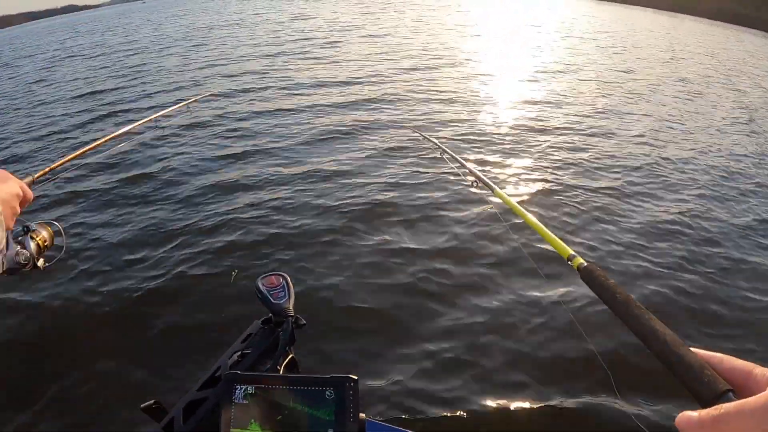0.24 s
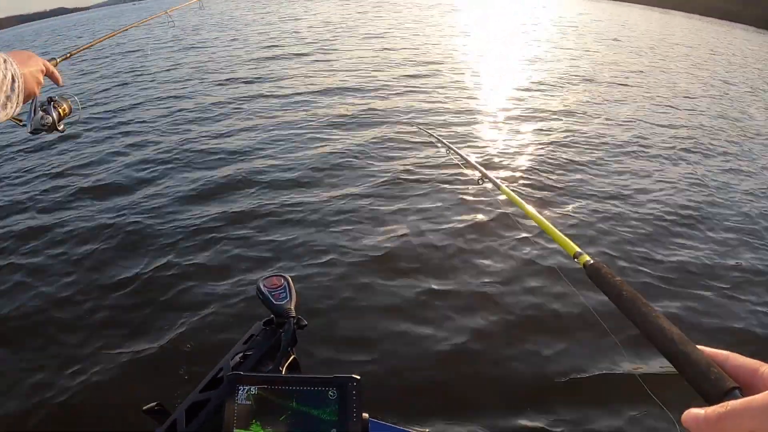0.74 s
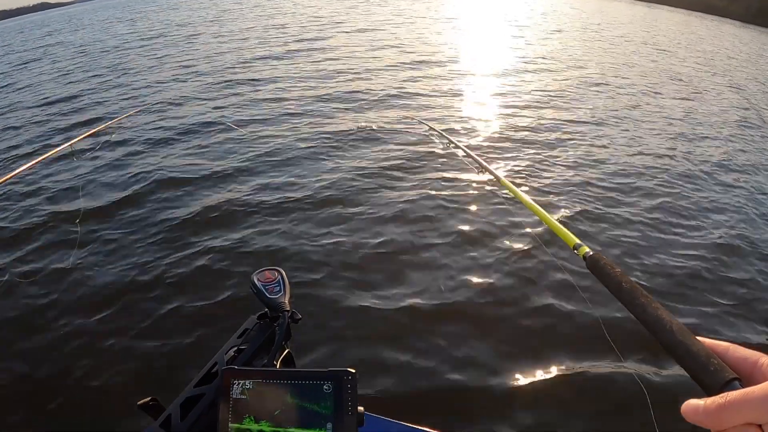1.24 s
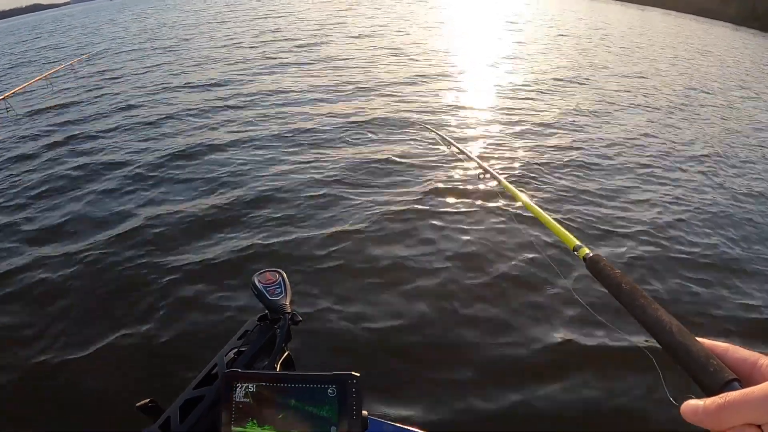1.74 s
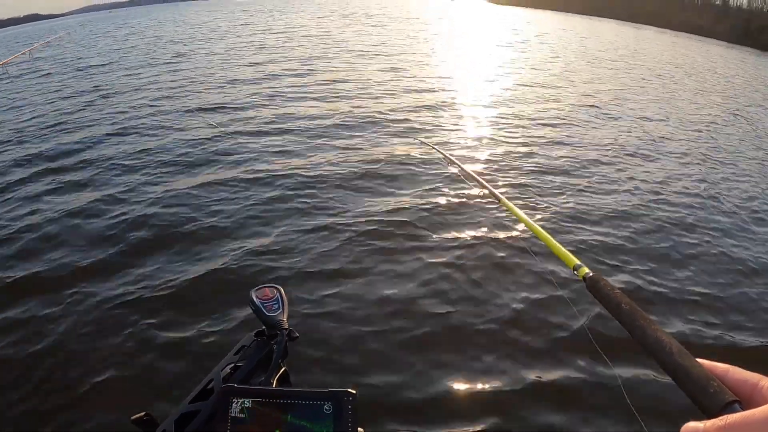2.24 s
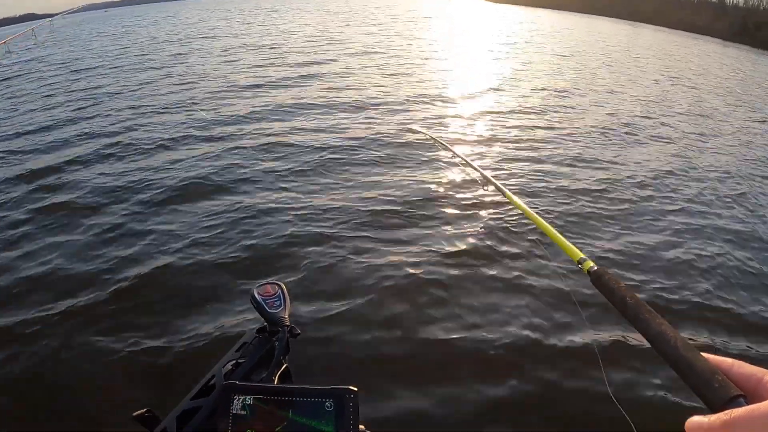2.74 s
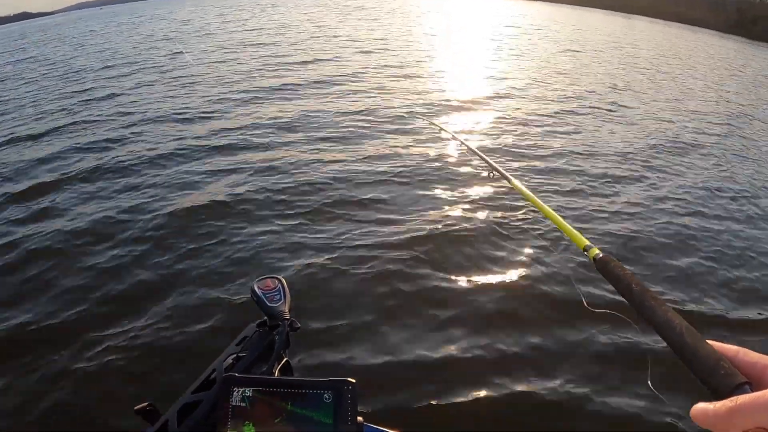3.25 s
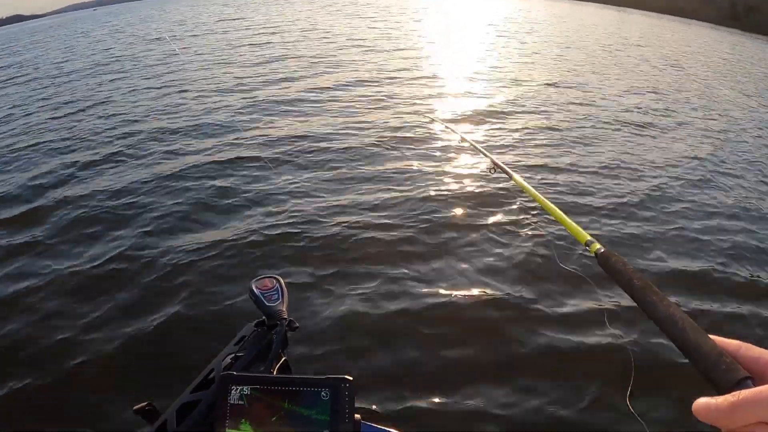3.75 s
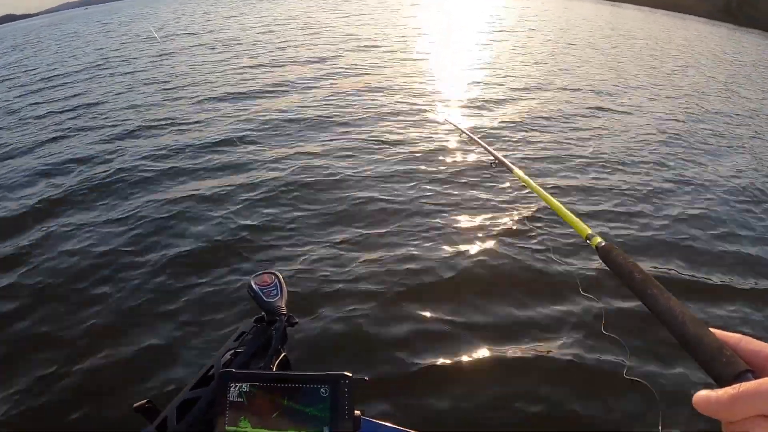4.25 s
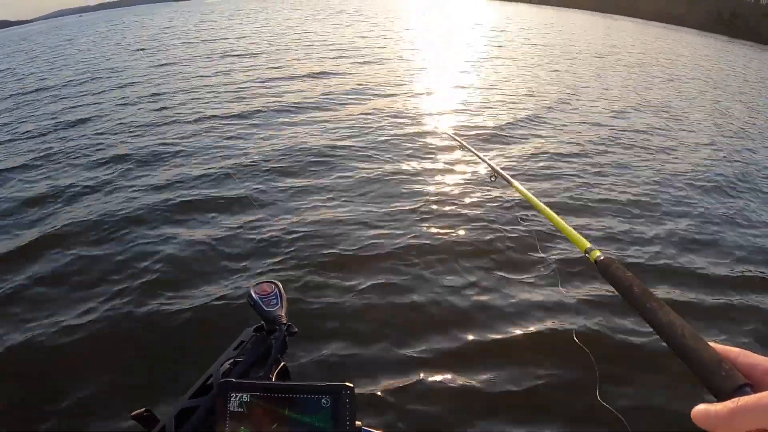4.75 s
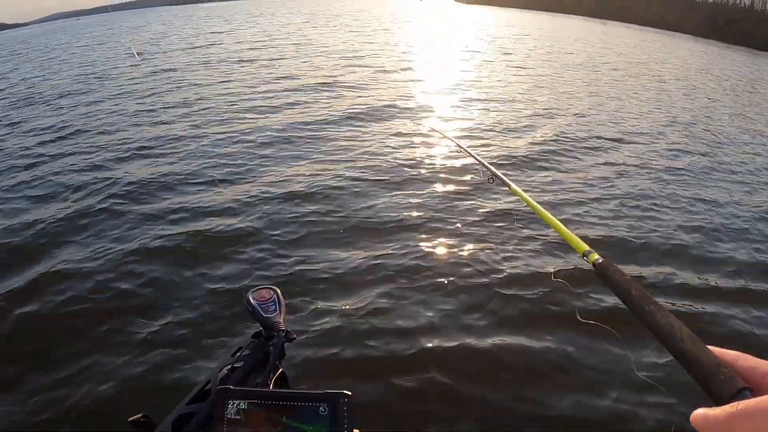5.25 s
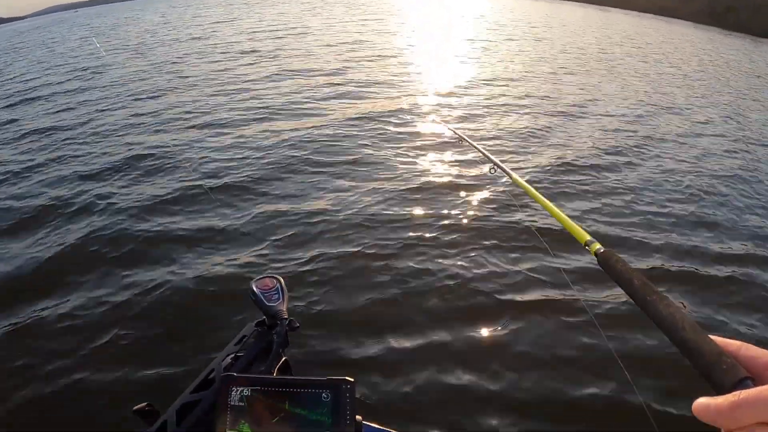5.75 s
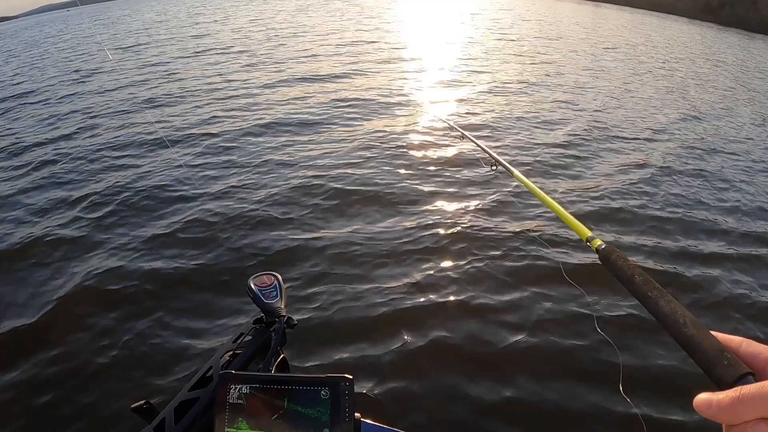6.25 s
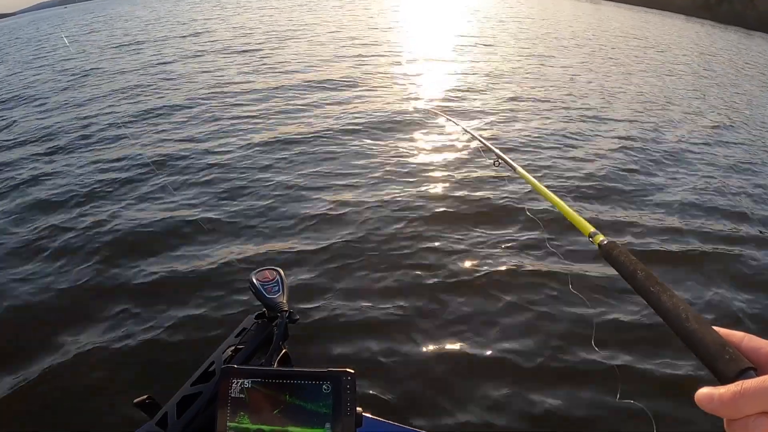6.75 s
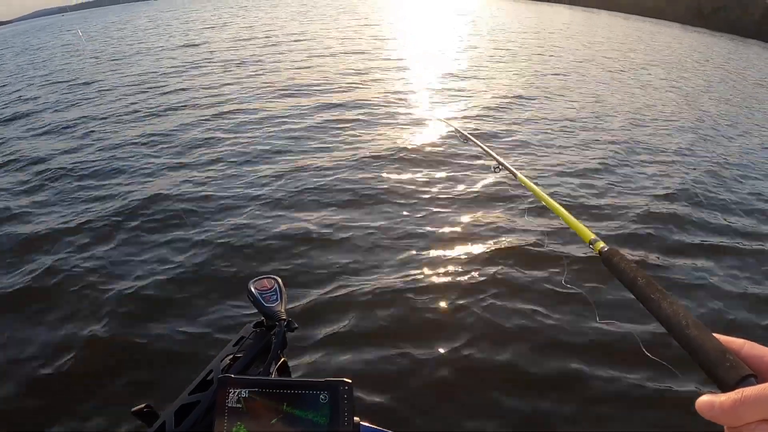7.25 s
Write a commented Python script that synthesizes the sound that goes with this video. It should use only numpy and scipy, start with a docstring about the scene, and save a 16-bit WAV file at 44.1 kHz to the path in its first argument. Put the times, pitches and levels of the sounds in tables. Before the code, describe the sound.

Small waves lap against the hull of an open boat on a lake, heard close up from on board. A sharp wet smack comes at about 0.5 seconds, then hollow slaps at around 1, 1.4, 2.3 and 2.8 seconds, each with bubbly plops, droplets and a brief fizz of foam. From 3 seconds the lapping is lighter and irregular, with small splashes and gurgles near 4.4, 4.9, 5.4, 6.5 and 7.2 seconds. Wind buffets the microphone with a low, uneven rumble, gusting near 1 second, between 2 and 3 seconds and at 4 seconds, then more strongly from about 5.2 to 6.7 seconds, with a last short thump of wind near 7.5 seconds. Underneath, a faint, slightly wavering electric motor hum and the low wash of open water continue throughout.

```python
"""On a lake, small waves slap the hull of an open boat, heard on board through two microphone ports.
Each impact sets the hull ringing, traps air pockets that resonate as plops, throws droplets
and leaves a fizz of bursting foam. Turbulent wind buffets the ports, an electric motor
hums through the hull, and the low wash of open water lies underneath."""
import sys
import numpy as np
from scipy import signal
from scipy.fft import rfft, irfft, next_fast_len
from scipy.io import wavfile
from scipy.ndimage import uniform_filter1d

SR = 44100
rng = np.random.default_rng(int(sys.argv[2]) if len(sys.argv) > 2 else 0)


def to_wav(sig):
    """Store sig (one row per channel, or 1-D mono) as 16-bit WAV at the path in sys.argv[1].

    Samples outside -1..1 are clipped; the rate is SR.
    """
    pcm = np.clip(np.atleast_2d(sig), -1, 1) * 32767
    pcm = np.round(pcm).astype(np.int16)
    wavfile.write(sys.argv[1], SR, pcm.T)  # frames by channels


N = 330309
FFT_SIZE = next_fast_len(N + 4096)
BIN_HZ = np.fft.rfftfreq(FFT_SIZE, 1 / SR)
TIME_S, COARSE_S = np.arange(N) / SR, np.arange(0, N + 64, 64) / SR

# foam left along the hull between waves: time_s, treble_db, body_db
FROTH_LEVELS = [(0.0, -62, -53.5), (0.7, -59.5, -51.5), (0.95, -66.5, -51.5), (1.25, -56.5, -51),
                (1.7, -63.5, -56), (2.2, -64, -58), (2.6, -74, -56.5), (3.5, -70, -56.5),
                (4.15, -72, -53.5), (4.6, -82.5, -57), (5.1, -58, -56), (5.32, -75, -69), (5.6, -63, -63),
                (6.35, -104, -74), (6.65, -61, -54.5), (6.9, -62.5, -70), (7.0, -88, -69), (7.49, -65, -63)]


def hull_thumps():
    """Impact excitation: each wave rings a hull mode and the deepest boom, inside a wet splat."""
    # waves striking the hull: start_s, level_db, pitch_hz, t60_s, boom_db
    impacts = [(1.011, -22, 512, 0.045, -28), (1.0445, -20, 424, 0.021, -16.5),
               (1.0535, -28, 445, 0.032, -39.5), (1.072, -25.5, 422, 0.065, -43),
               (1.398, -19.5, 374, 0.047, -34), (1.4064, -31, 433, .05, -40), (1.431, -35, 356, .03, -21.5),
               (1.89, -44.5, 380, .064, -44), (1.985, -26.5, 350, 0.026, -46),
               (2.183, -26, 341, 0.038, -37), (2.3385, -19, 376, .055, -22), (2.372, -25, 341, 0.053, -55),
               (2.8473, -22, 357, 0.023, -22.5), (4.362, -28, 455, 0.011, -42),
               (4.913, -27.5, 364, 0.021, -46), (5.408, -32.5, 384, 0.027, -30.5),
               (5.664, -29, 328, 0.025, -44.5), (5.985, -30.5, 328, 0.039, -30),
               (7.207, -32, 465, 0.12, -47)]
    boom_hz, boom_t60_s = 207.6, 0.032
    out = np.zeros((3, N))  # row 0 reaches both ports, rows 1 and 2 one port each
    for start_s, level_db, hz, t60_s, boom_db in impacts:
        mode = damped_tone(hz, t60_s, rise_s=.0006, glide=-.5, rough=.08)
        boom = damped_tone(boom_hz, boom_t60_s, rise_s=.0008, glide=-.5, rough=.1)
        add(out[0], start_s, -gain_of(level_db) * mode)
        add(out[0], start_s, -gain_of(boom_db) * boom)
        add(out, start_s, gain_of(level_db) * splat(hz, width=.18, burst_db=-33, tail_db=-22))
    return out


def hull_smacks():
    """Heavy damping: water landing flat on the hull gives a click only a few cycles long."""
    # flat impacts: start_s, level_db, pitch_hz
    smacks = [(0.4528, -17.5, 1450), (0.4876, -24, 1760), (1.043, -35, 2900), (1.1305, -22.5, 2500),
              (1.3992, -34, 1200), (1.9006, -33, 1480), (1.921, -23.5, 1090), (2.3385, -24, 920),
              (2.3385, -33, 2840), (2.848, -29, 1310), (3.259, -34, 2000), (4.9123, -36, 1500),
              (5.3663, -34, 2290), (5.665, -47, 1500), (6.5716, -31.5, 2390)]
    out = np.zeros((3, N))
    for start_s, level_db, hz in smacks:
        click = damped_tone(hz, t60_s=.004, rise_s=.0003, glide=0, rough=.1)
        add(out[0], start_s, -gain_of(level_db) * click)
    return out


def air_pockets():
    """Bubble resonance: trapped air rings as a spring against the water; two smaller pockets follow."""
    # pockets closing: start_s, level_db, pitch_hz, t60_s
    plops = [(0.105, -34, 832, 0.047), (0.126, -32, 1290, 0.034), (0.341, -42, 1650, 0.028),
             (0.399, -31, 1140, .02), (0.425, -27.5, 660, 0.03), (0.447, -25, 1174, 0.0095),
             (0.45, -22, 1188, 0.013), (0.452, -36, 1660, 0.015), (0.457, -25, 676, 0.016),
             (0.482, -24, 1290, 0.014), (0.488, -26.5, 1800, 0.022), (0.4888, -28, 1010, 0.016),
             (0.511, -32, 1280, 0.04), (0.523, -36, 1530, .03), (0.5888, -41.5, 580, 0.083),
             (0.7917, -45, 1810, 0.024), (1.0109, -37, 487, 0.051), (1.042, -33, 1450, 0.0099),
             (1.079, -32.5, 1450, 0.034), (1.079, -38.5, 1020, 0.083), (1.089, -31, 1510, 0.014),
             (1.1267, -34, 1080, 0.027), (1.2078, -39, 1834, 0.044), (1.277, -36.5, 1270, 0.019),
             (1.3107, -39, 646, 0.025), (1.3424, -35, 1660, 0.033), (1.3798, -35, 1240, .04),
             (1.3993, -28, 777, 0.052), (1.3991, -32.5, 1374, 0.012), (1.4289, -34, 770, 0.036),
             (1.4941, -42, 786, 0.021), (1.839, -35.5, 1887, 0.011), (1.9005, -30, 1140, 0.018),
             (1.9202, -39, 498, 0.031), (1.9834, -31.5, 548, 0.019), (1.997, -41, 1264, 0.05),
             (2.0069, -26.5, 781, .03), (2.082, -34, 1278, 0.047), (2.19, -33, 485, 0.026),
             (2.2645, -40, 1046, 0.046), (2.3135, -32.5, 1573, 0.022), (2.3384, -34, 1220, 0.023),
             (2.352, -31.5, 597, 0.055), (2.7125, -30, 772, 0.015), (2.724, -40, 833, 0.033),
             (2.777, -41.5, 1960, 0.043), (2.787, -39, 1564, 0.048), (2.8356, -28, 1430, 0.04),
             (2.844, -34, 1510, .025), (2.848, -27, 983, 0.013), (2.862, -34.5, 990, 0.083),
             (3.2578, -33.5, 1680, 0.068), (3.2585, -36, 1233, 0.034), (3.315, -41.5, 1923, .05),
             (3.331, -32.5, 1048, 0.026), (3.335, -37, 1330, 0.055), (3.838, -34.5, 1535, 0.04),
             (3.84, -39, 1070, 0.035), (3.8775, -32.5, 629, 0.049), (4.0184, -37.5, 824, 0.039),
             (4.252, -39, 1280, .03), (4.2624, -41, 680, 0.022), (4.346, -39, 1576, 0.04),
             (4.3585, -36, 559, 0.081), (4.4436, -32, 709, 0.019), (4.455, -29, 681, 0.028),
             (4.818, -36, 1267, 0.044), (4.853, -43, 1720, .03), (4.858, -34.5, 1244, 0.03),
             (4.885, -40, 1365, 0.023), (4.912, -30, 977, .04), (4.93, -32.5, 831, 0.059),
             (5.045, -42.5, 1660, .03), (5.078, -45, 1135, .04), (5.368, -37.5, 930, 0.046),
             (5.4007, -31.5, 1460, 0.047), (5.412, -37.5, 1230, 0.041), (5.4903, -35, 1514, 0.023),
             (5.6642, -29, 806, 0.023), (5.578, -45.5, 1710, 0.023), (5.744, -37.5, 853, 0.033),
             (5.747, -46, 1790, 0.034), (5.877, -49, 1610, 0.026), (5.9202, -40.5, 1186, 0.062),
             (5.976, -46, 1430, 0.026), (5.978, -34, 516, 0.053), (6.006, -39, 1780, 0.051),
             (6.06, -48, 1740, .03), (6.148, -48, 1013, .04), (6.520, -43, 1980, 0.027),
             (6.5265, -34, 1784, 0.021), (6.533, -44, 1650, 0.019), (6.536, -47, 2420, 0.056),
             (6.571, -32, 1554, .02), (6.574, -28, 1870, 0.036), (6.583, -37.5, 1654, 0.036),
             (6.603, -49, 2000, 0.026), (6.649, -42, 1380, .03), (6.682, -44, 1007, 0.027),
             (6.722, -46.5, 1500, 0.022), (6.8, -52, 1710, 0.029), (6.845, -48, 1720, .035),
             (7.104, -37, 1367, 0.043), (7.1379, -44.5, 847, 0.042), (7.2265, -31, 745, 0.027),
             (7.231, -33, 856, 0.069), (7.23, -30, 1247, 0.041), (7.247, -38.5, 857, 0.044)]
    gurgle_db, gurgle_within_s, scatter_octaves = -11, 0.034, 0.4
    out = np.zeros((3, N))
    for start_s, level_db, hz, t60_s in plops:
        plop = damped_tone(hz, t60_s, rise_s=t60_s / 25, glide=-3, rough=.22)
        add(out[0], start_s, gain_of(level_db) * plop)
        add(out, start_s, gain_of(level_db) * splat(hz, width=.35, burst_db=-13, tail_db=-16.5))
        for late, shift in rng.random((2, 2)):
            gurgle_hz = hz * 2 ** (scatter_octaves * (2 * shift - 1))
            gurgle = damped_tone(gurgle_hz, t60_s / 2, rise_s=t60_s / 25, glide=3, rough=.3)
            add(out[0], start_s + gurgle_within_s * late, gain_of(level_db + gurgle_db - 10 * late) * gurgle)
    return out


def droplets():
    """Drop impact: a broadband tick as the surface breaks, with a rising ring and a splat."""
    # droplets landing: start_s, level_db, pitch_hz, tick_db
    landings = [(0.007, -39.5, 4010, -53), (0.035, -46, 3430, -64), (0.0662, -41, 4560, -59),
                (0.0818, -56, 3640, -48), (0.092, -43, 2760, -57), (0.1, -54, 6300, -31),
                (0.3184, -47, 2730, -69), (0.3286, -42.5, 2300, -73), (0.3754, -47, 3630, -66),
                (0.4053, -41, 5320, -53), (0.441, -46, 2510, -45), (0.4534, -37, 2360, -51),
                (0.472, -37, 3770, -49), (0.489, -31, 2430, -33), (0.553, -43, 4540, -59),
                (0.5652, -36, 2360, -37), (0.6516, -41.5, 5000, -57), (0.6653, -40, 2110, -64),
                (0.69, -46, 4680, -60), (0.7903, -55, 6960, -61), (0.812, -57, 7200, -62),
                (0.862, -62, 3900, -68), (0.886, -57, 5050, -64), (0.9952, -48, 5030, -49),
                (1.023, -49, 3200, -52), (1.0423, -36, 3970, -30), (1.08, -44, 4320, -44),
                (1.111, -31.5, 2750, -47), (1.13, -28.5, 2765, -55), (1.149, -37.5, 4920, -43),
                (1.166, -43, 3450, -63), (1.2017, -41, 2990, -40.5), (1.239, -42.5, 4600, -62),
                (1.275, -55, 4670, -62), (1.312, -49, 4840, -62), (1.354, -40, 2420, -54),
                (1.3886, -37, 5400, -49), (1.419, -45, 6380, -30), (1.5271, -45, 2200, -63),
                (1.833, -38, 4620, -62), (1.896, -43, 4870, -58), (1.916, -46, 2640, -38),
                (1.947, -42, 4960, -38), (1.981, -43, 2630, -40), (1.995, -41.5, 4590, -61),
                (2.054, -47, 2240, -53), (2.178, -58, 5600, -61), (2.297, -44.5, 3930, -58),
                (2.308, -41, 2320, -59), (2.337, -40, 4580, -57), (2.446, -50, 2930, -54),
                (2.465, -53, 5900, -56), (2.521, -53, 5530, -62), (2.6928, -55.5, 5400, -65),
                (2.7087, -49.5, 2580, -73), (2.739, -55, 3680, -70), (2.75, -49.5, 4570, -70),
                (2.766, -53, 7940, -51), (2.812, -50, 4500, -65), (2.841, -45, 4040, -64),
                (2.937, -54, 3840, -52), (2.985, -50, 2040, -72), (3.132, -56, 4600, -72),
                (3.138, -46.5, 3240, -75), (3.2586, -47, 3340, -43), (3.284, -57, 3280, -64),
                (3.309, -50.5, 4950, -67), (3.324, -43.5, 7430, -58), (3.4462, -50.5, 3140, -42),
                (3.591, -52, 4000, -73), (3.738, -55, 7900, -37), (3.821, -49, 4720, -70),
                (3.838, -41.5, 2240, -69), (3.8684, -48.5, 5030, -63), (3.913, -48, 6600, -44),
                (3.923, -42, 3950, -41), (3.924, -45, 2710, -66), (3.9588, -37.5, 4830, -51),
                (4.018, -55, 7240, -45), (4.064, -59, 5040, -58), (4.106, -60, 4400, -58),
                (4.138, -52, 5550, -67), (4.2143, -42.5, 2304, -61), (4.2646, -49, 4680, -36),
                (4.298, -56, 5300, -66), (4.3587, -48, 4970, -55), (4.4234, -50.5, 7400, -51),
                (4.436, -42, 3215, -59), (4.736, -58, 2620, -45.5), (4.8195, -38.5, 5210, -62),
                (4.822, -44.5, 3900, -66), (4.8677, -34, 2600, -41), (4.8887, -52, 8800, -38),
                (4.9128, -44, 5500, -54), (4.9717, -52, 5500, -58), (4.975, -52, 3380, -70),
                (5.003, -56, 4500, -70), (5.055, -55, 3900, -70), (5.065, -49, 2860, -58),
                (5.1, -51, 3220, -60), (5.126, -47, 2700, -71), (5.273, -48, 2970, -70.5),
                (5.3645, -46, 2280, -42), (5.385, -33.5, 2490, -46), (5.4013, -39, 5380, -62),
                (5.4265, -44, 5600, -43), (5.4525, -43.5, 6020, -50), (5.491, -35, 4880, -49),
                (5.54, -46.5, 4840, -70), (5.567, -50, 5140, -58), (5.573, -46, 2390, -60),
                (5.603, -59, 7500, -60), (5.6413, -44.5, 2300, -63), (5.6646, -42, 4500, -37),
                (5.718, -54, 5300, -58), (5.7425, -51.5, 8140, -49), (5.743, -53, 3550, -70),
                (5.877, -59, 2660, -75), (5.921, -46.5, 5280, -49), (5.979, -49, 3980, -48),
                (6.007, -58, 7850, -52), (6.0583, -51.5, 3370, -53), (6.092, -56, 4670, -62),
                (6.13, -45, 4720, -63), (6.141, -44, 2710, -50), (6.248, -48, 5000, -63),
                (6.487, -51, 2600, -62), (6.507, -49, 4030, -66), (6.52, -47, 6380, -35),
                (6.537, -41, 3030, -36), (6.555, -45, 4800, -66), (6.5729, -46, 2300, -66),
                (6.6252, -51, 6700, -42), (6.695, -53, 5800, -62), (6.735, -47, 3230, -55),
                (6.801, -50.5, 2800, -60), (6.807, -50, 3600, -66), (6.822, -55, 2300, -70),
                (6.83, -56, 4100, -70), (6.8857, -47, 5180, -70), (7.103, -47, 2900, -43),
                (7.155, -46, 6160, -40), (7.2134, -46, 4500, -59), (7.3584, -52, 6850, -55),
                (7.373, -49, 4400, -46), (7.4213, -45.5, 2500, -65)]
    # spectrum of the tick: frequency_hz, gain_db
    tick_spectrum = [(1500, -40), (3500, -0.5), (6000, 8.5), (8000, -1.5), (10000, -16), (14000, -34)]
    ring_cycles, tick_rise_s, tick_t60_s = 72, 0.0034, 0.016
    out, ticks = np.zeros((2, 3, N))
    t = np.arange(1500) / SR
    tick_envelope = gain_of(-60 * t / tick_t60_s) * (1 - np.exp(-t / tick_rise_s))
    for start_s, level_db, hz, tick_db in landings + stray_drops():
        plink = damped_tone(hz, ring_cycles / hz, rise_s=.00054, glide=4, rough=.44)
        add(out[0], start_s, gain_of(level_db) * plink)
        add(out, start_s, gain_of(level_db) * splat(hz, width=.26, burst_db=-16.5, tail_db=-16))
        add(ticks, start_s, gain_of(tick_db) * tick_envelope * rng.standard_normal((3, len(t))))
    return out + coloured(ticks, tick_spectrum)


def stray_drops():
    """Random arrivals: small droplets land by chance, louder where there is more froth."""
    drops_per_s, above_froth_db, tick_offset_db = 14, 8.5, -5
    when, size, pitch = rng.random((round(drops_per_s * N / SR), 3)).T
    start_s = when * (N / SR - .1)
    froth_db = over_time(FROTH_LEVELS, column=1)[(start_s * SR).astype(int)]
    level_db = froth_db + above_froth_db + 4.5 * (size - .5)
    return list(zip(start_s, level_db, 1700 * 5 ** pitch, level_db + tick_offset_db))


def splat(hz, width, burst_db, tail_db):
    """Scattering: a wet burst of narrow-band noise, then diffuse returns from the hull, in three rows."""
    # reverberation in the boat: frequency_hz, t60_s
    reverberation = [(300, 0.84), (1000, 0.22), (3000, 0.098), (10000, 0.15)]
    t60_s = over_frequency(reverberation, hz)
    t = np.arange(min(round(.75 * t60_s * SR), 5000)) / SR
    pole = np.exp(-np.pi * width * hz / SR)
    noise = rng.standard_normal((2, 3, len(t)))
    in_phase, quadrature = signal.lfilter([1], [1, -2 * pole, pole * pole], noise)
    phase = 2 * np.pi * hz * t
    band = unit_rms(in_phase * np.sin(phase) + quadrature * np.cos(phase))
    burst = gain_of(burst_db - 60 * t / (0.023 + 28 / hz))
    tail = gain_of(tail_db - 60 * t / t60_s) * np.cos(np.pi / 2 * t / t[-1])
    return band * (burst + tail) * (1 - np.exp(-t * hz / 3.2))


def foam():
    """Shot noise: thousands of tiny bursting bubbles merge with a hiss that follows the spray."""
    # spectrum of the fizz: frequency_hz, gain_db
    fizz_spectrum = [(240, -18), (400, 9), (485, 5.5), (757, -1.5), (1290, -6.5), (1820, -11.5),
                     (1950, -12.5), (2710, -23), (5690, -35), (11900, -49.5), (13800, -70.5)]
    pops_per_pitch, pop_db, scatter_db, ring_cycles = 400, -3, 2, 36
    pops = np.zeros(N)
    for hz in np.geomspace(900, 11000, num=16):
        onsets = rng.integers(0, N, size=pops_per_pitch)
        sizes = gain_of(scatter_db * np.minimum(rng.exponential(size=pops_per_pitch), 4))
        pop = damped_tone(hz, ring_cycles / hz, rise_s=2.5 / hz, glide=6, rough=.3) * np.sqrt(hz)
        pops += signal.oaconvolve(np.bincount(onsets, sizes, N), pop)[:N]
    hiss = rng.standard_normal((3, N))
    hiss[0] += gain_of(pop_db) * unit_rms(pops)
    fizz = rfft(hiss, FFT_SIZE) * gain_of(over_frequency(fizz_spectrum, BIN_HZ))
    high_band = 1 / (1 + (3000 / (BIN_HZ + 1)) ** 6)
    mid_band = 1 / (1 + (1000 / (BIN_HZ + 1)) ** 6) - high_band
    body = irfft(fizz * (1 - high_band), FFT_SIZE)[:, :N] / np.std(irfft(fizz[0] * mid_band, FFT_SIZE))
    treble = unit_rms(irfft(fizz * high_band, FFT_SIZE)[:, :N])
    treble_gain, body_gain = spray_gains()
    flicker_db = 2.5 * wander(hz=25)
    return gain_of(flicker_db - 8) * (body * body_gain + treble * treble_gain)


def spray_gains():
    """Incoherent sources add in power: lingering froth plus an exponential surge at each wave."""
    # waves breaking into spray: peak_s, treble_db, body_db, rise_s, fall_s
    surges = [(0.103, -43, -46, 0.011, 0.0094), (0.454, -39, -34, 0.0088, 0.012),
              (0.49, -43.5, -44, 0.005, 0.02), (0.57, -47.5, -52, 0.016, 0.031),
              (0.67, -49.5, -63, 0.011, 0.028), (1.044, -43, -43, 0.015, 0.03),
              (1.08, -43, -39, .002, 0.016), (1.13, -47, -56, 0.013, .0068),
              (1.385, -45.5, -41, 0.017, 0.015), (1.402, -49, -36.5, 0.0027, 0.037),
              (1.855, -58, -46, 0.008, 0.0083), (1.92, -48, -35.5, 0.0092, 0.019),
              (2.005, -51.5, -39.5, 0.011, 0.033), (2.31, -54, -43.5, 0.025, 0.0087),
              (2.339, -50, -43, 0.0029, 0.0047), (2.46, -58.5, -53, 0.011, 0.012),
              (2.84, -51, -42, 0.0036, 0.009), (3.13, -57.5, -54, 0.0046, 0.016),
              (3.257, -57, -45.5, 0.0037, 0.017), (3.335, -69, -45.5, .01, 0.012),
              (3.61, -57, -67, 0.012, 0.0097), (3.731, -49.5, -61, 0.0026, 0.0083),
              (3.871, -56, -43, 0.013, 0.007), (3.922, -47, -49, 0.0025, 0.005),
              (3.96, -55, -50, 0.0031, 0.0067), (4.269, -54, -43, 0.013, 0.017),
              (4.358, -46, -42, 0.0069, 0.0078), (4.44, -52, -43, 0.0085, .0065),
              (4.821, -54, -47, 0.016, 0.068), (4.916, -60, -37.5, 0.0035, 0.013),
              (5.367, -55, -49, .002, 0.033), (5.404, -48, -40, .003, 0.018),
              (5.495, -44, -47.5, 0.0034, 0.011), (5.667, -64, -44, 0.0036, 0.016),
              (5.922, -64, -53, 0.0022, 0.11), (6.134, -55, -47.5, 0.0072, 0.0083),
              (6.532, -49, -46, 0.0062, 0.017), (6.57, -47, -47.5, 0.0034, 0.014),
              (7.11, -63, -49, 0.0091, 0.017), (7.154, -55.5, -42.5, 0.013, 0.014),
              (7.232, -50, -32, 0.0058, 0.0058), (7.389, -50.5, -52.5, 0.0073, 0.0078)]
    surge_power = np.zeros((2, len(COARSE_S)))
    for peak_s, treble_db, body_db, rise_s, fall_s in surges:
        t = COARSE_S - peak_s
        envelope = np.exp(np.where(t < 0, t / rise_s, -t / fall_s))
        surge_power += gain_of([[2 * treble_db], [2 * body_db]]) * envelope
    froth_power = [gain_of(2 * over_time(FROTH_LEVELS, column)) for column in (1, 2)]
    return [np.sqrt(froth + per_sample(surge)) for froth, surge in zip(froth_power, surge_power)]


def wind():
    """Turbulent pressure at the ports: a mostly shared rumble, with a brighter flutter in hard gusts."""
    # sustained wind: time_s, level_db, left_right_db
    breeze = [(0.0, -39, 1), (0.44, -41, -7), (0.7, -47, 5), (1.2, -34, 7), (1.48, -40, 6),
              (1.75, -30.5, 0), (2.1, -26, -4), (2.6, -30, 1), (3.0, -40, 7), (3.46, -37, 9),
              (3.7, -32.5, -1), (4.2, -37, 1), (4.45, -32.5, 5), (4.62, -31, -6), (5.0, -36.5, 6),
              (5.3, -24, -8), (5.6, -27.5, -1), (5.95, -19.5, -3.5), (6.2, -39.5, 6), (6.55, -21, -2),
              (6.9, -30, -1), (7.25, -28.5, -0.5), (7.49, -20.5, -5)]
    # hard buffets: peak_s, level_db, half_length_s, left_right_db
    buffets = [(0.185, -31, 0.033, -1), (0.773, -24, 0.011, 0), (0.902, -19, 0.027, -4),
               (0.978, -17.5, 0.012, -12.5), (1.91, -20, 0.029, 0), (2.188, -22.5, 0.011, -9),
               (2.297, -22, 0.044, -6.5), (2.457, -43, 0.016, 9), (2.69, -21, 0.0073, -4),
               (2.793, -22, 0.033, 0), (3.18, -22.5, 0.081, -3), (3.804, -30.5, 0.058, 2),
               (4.027, -20, 0.044, -5), (5.173, -19.5, 0.013, 0), (5.262, -21.5, 0.022, -11),
               (5.357, -18.5, 0.01, -6), (5.768, -20.5, 0.038, -3), (5.936, -16, 0.014, -2),
               (6.013, -20, 0.014, -4), (6.315, -20, 0.012, -1), (6.494, -20.5, 0.075, -8),
               (6.645, -22.5, 0.021, -2), (7.471, -8, 0.0052, -6)]
    # spectrum of the turbulence: frequency_hz, gain_db
    rumble_spectrum = [(8.8, -33.5), (15, 2.5), (51, 0), (97, -6), (119, -9.5), (199, -24.5), (292, -34.5),
                       (308, -28), (400, -62.5), (520, -57), (880, -120)]
    power = gain_of(2 * over_time(breeze, column=1) + 2 * wander(hz=4)[0])
    weighted_pan = power * over_time(breeze, column=2)
    for peak_s, peak_db, half_length_s, left_right_db in buffets:
        buffet_power = per_sample(gain_of(2 * peak_db) * np.exp(-((COARSE_S - peak_s) / half_length_s) ** 2))
        power += buffet_power
        weighted_pan += buffet_power * left_right_db
    level_db, pan_db = 10 * np.log10(power), weighted_pan / power
    both, left, right = (unit_rms(row) for row in coloured(rng.standard_normal((3, N)), rumble_spectrum))
    rumble = gain_of(level_db - 5) * unit_rms(both + 0.41 * np.array([left, right]))
    flutter_band = signal.butter(2, [90, 260], "bandpass", fs=SR)
    eddies = signal.lfilter(*flutter_band, rng.standard_normal((3, N)))
    flutter_db = 1.5 * np.minimum(level_db + 25, 5) - 56  # grows faster than the rumble, up to a cap
    flutter = gain_of(flutter_db) * unit_rms(eddies[0] + 0.67 * eddies[1:])
    return gain_of(pan_db * np.array([[.5], [-.5]])) * (rumble + flutter)


def motor():
    """Structure-borne sound: the hull carries motor tones that waver in pitch and strength."""
    # motor tones: pitch_hz, level_db, side_ratio
    tones = [(98.16, -42, 0.066), (146.8, -51.5, .05), (197.5, -48, 0.069), (221.2, -51.5, .05),
             (249.3, -54, .05), (286.5, -53, .1), (341.8, -63, .2), (382.7, -60, 0.33), (657, -70, 1)]
    hz, level_db, side_ratio = np.transpose(tones)[:, :, None]
    drift = 1 + 0.00646 * wander(hz=1.579) + 0.00376 * wander(hz=2.63, count=len(tones))
    phase = 2 * np.pi * np.cumsum(hz * drift, axis=1) / SR
    amplitude = np.sqrt(2) * gain_of(level_db + 2.87 * wander(hz=4.46, count=len(tones)))
    mid = (amplitude * np.sin(phase)).sum(0)
    side = (amplitude * side_ratio * np.cos(phase)).sum(0)
    return mid + side * np.array([[1], [-1]])


def lake_wash():
    """Amplitude-modulated noise: the wash of open water wavers, and its bass slowly swells and sinks."""
    # rise and fall of the low wash: time_s, level_db
    swell = [(0.0, -38), (1.1, -38.5), (1.77, -41.5), (1.94, -40), (2.35, -36.5), (2.54, -41), (2.9, -38),
             (3.21, -41), (4.49, -42), (4.82, -39), (5.28, -37), (5.57, -42.5), (5.97, -47), (6.15, -43),
             (6.57, -43.5), (6.97, -48), (7.49, -48.5)]
    # spectrum of open water and hull rumble: frequency_hz, gain_db
    wash_spectrum = [(18, -28.5), (30, -7), (88, 3), (114, -3), (151, -7.5), (216, -5), (295, -10.5),
                     (456, -23), (822, -33), (1210, -30), (1920, -44.5), (5350, -59), (11900, -69),
                     (13800, -87)]
    wash = coloured(rng.standard_normal((3, N)), wash_spectrum)
    bass = signal.lfilter(*signal.butter(2, 500, fs=SR), wash)
    mean_db = np.mean(np.transpose(swell)[1])
    swelling = bass * gain_of(over_time(swell, column=1) - mean_db) + wash - bass
    swelling *= gain_of(mean_db + 2.5 + 2.7 * wander(hz=3.3)) / np.std(wash)
    return microphone_ports(swelling, spread=1)


def microphone_ports(rows, spread):
    """Partial coherence: two close ports share row 0, offset in phase and level, and add a row each."""
    # likeness of the ports: frequency_hz, correlation
    likeness = [(60, 1), (150, 1), (300, 1), (600, 0.8), (1500, 0.42), (4500, 0.62), (8000, 0.3),
                (13400, -0.27)]
    # phase lead of the left port: frequency_hz, lead_rad
    lead = [(100, -0.07), (430, -0.064), (700, -0.31), (2200, -0.5), (3200, -0.87), (4500, 0.39),
            (8000, -0.3), (13500, -1.2)]
    # level difference of the ports: frequency_hz, left_right_db
    balance = [(60, -1.5), (230, 1.5), (900, 2), (3460, 0), (8000, 4), (13400, 3)]
    margin = 2048
    spectra = rfft(np.pad(rows, ((0, 0), (margin, margin)), "reflect"), FFT_SIZE)
    coherence = np.clip(1 - spread * (1 - over_frequency(likeness, BIN_HZ)), 0, 1)
    offset = gain_of(over_frequency(balance, BIN_HZ) / 2) * np.exp(.5j * over_frequency(lead, BIN_HZ))
    shared = np.sqrt(coherence) * spectra[0] * np.array([offset, 1 / offset])
    separate = np.sqrt(1 - coherence) * spectra[1:]
    return irfft(shared + separate, FFT_SIZE)[:, margin:margin + N]


def damped_tone(hz, t60_s, rise_s, glide, rough):
    """A damped oscillation of peak 1, gliding linearly in pitch and roughened by narrow-band noise."""
    t = np.arange(round(np.clip(t60_s, .01, .1) * SR)) / SR
    envelope = (1 - np.exp(-t / rise_s)) * gain_of(-60 * t / max(t60_s, .004))
    ragged = unit_rms(uniform_filter1d(rng.standard_normal((2, len(t))), max(int(SR / hz), 2)))
    phase = 2 * np.pi * hz * (t + glide * t ** 2)
    tone = envelope * ((1 + rough * ragged[0]) * np.sin(phase) + rough * ragged[1] * np.cos(phase))
    return tone / np.abs(tone).max()


def wander(hz, count=1):
    """Low-pass noise: slow random curves of rms 1."""
    step = 100
    noise = rng.standard_normal((count, (N + SR) // step + 2))
    slow = unit_rms(signal.lfilter(*signal.butter(2, hz, fs=SR / step), noise)[:, SR // step:])
    return np.array([np.interp(np.arange(N) / step, np.arange(len(row)), row) for row in slow])


def coloured(x, spectrum_db):
    """Zero-phase filtering by a spectrum in dB."""
    return irfft(rfft(x, FFT_SIZE) * gain_of(over_frequency(spectrum_db, BIN_HZ)), FFT_SIZE)[..., :N]


def over_frequency(points, hz):
    """Linear interpolation on a log-frequency axis."""
    point_hz, values = np.transpose(points)
    return np.interp(np.log(hz + 1), np.log(point_hz + 1), values)


def over_time(table, column):
    """Linear interpolation of one column in time."""
    columns = np.transpose(table)
    return np.interp(TIME_S, columns[0], columns[column])


def per_sample(coarse):
    return np.interp(TIME_S, COARSE_S, coarse)


def gain_of(db):
    return 10 ** (np.asarray(db) / 20)


def unit_rms(x):
    return x / np.sqrt(np.mean(x ** 2) + 1e-20)


def add(mix, start_s, sound):
    part = mix[..., round(start_s * SR):][..., :sound.shape[-1]]
    part += sound[..., :part.shape[-1]]


def scene():
    """Superposition: the splashes are close by, so they differ less between the ports than the wash."""
    water = hull_thumps() + hull_smacks() + air_pockets() + droplets() + foam()
    return microphone_ports(water, spread=0.55) + motor() + lake_wash() + wind()


def record(dry):
    """Band limiting: a linear-phase low-pass filter removes the highest treble."""
    cutoff_hz = 14000
    low_pass = signal.firwin(511, cutoff_hz, window=("kaiser", 9), fs=SR)
    padded = np.pad(dry, ((0, 0), (255, 255)), "reflect", reflect_type="odd")
    return signal.oaconvolve(padded, low_pass[None], "valid")


dry = scene()
out = record(dry)
to_wav(out)
```